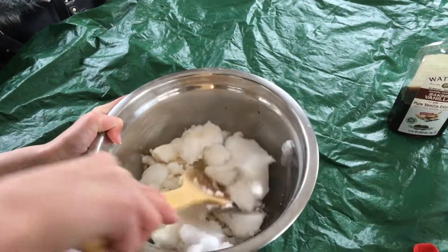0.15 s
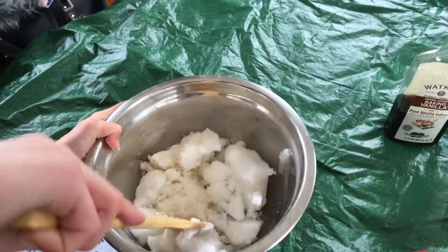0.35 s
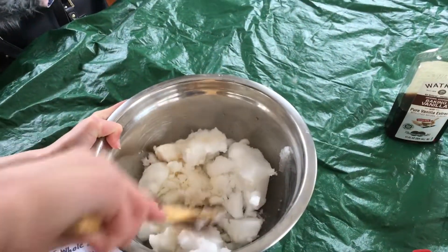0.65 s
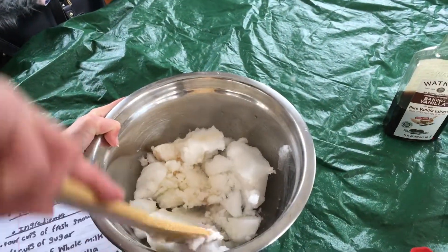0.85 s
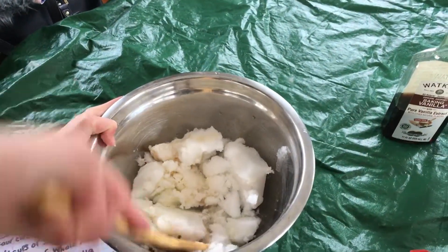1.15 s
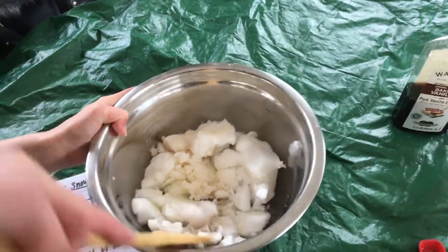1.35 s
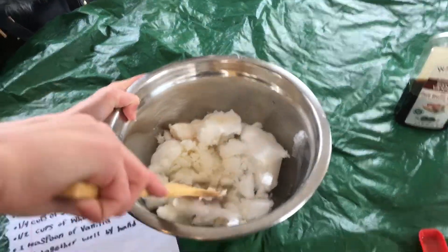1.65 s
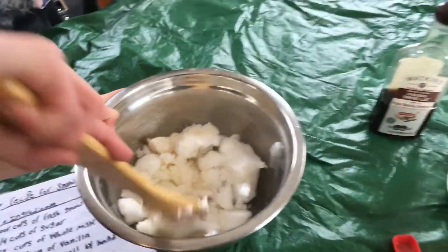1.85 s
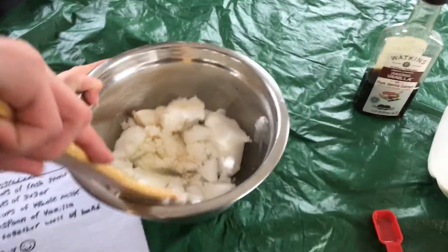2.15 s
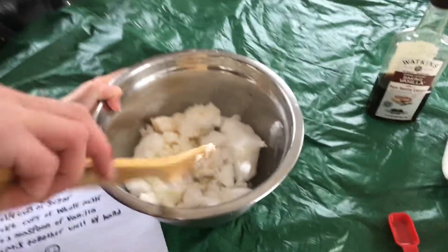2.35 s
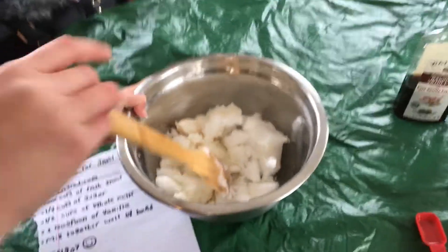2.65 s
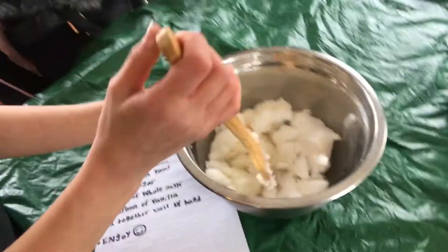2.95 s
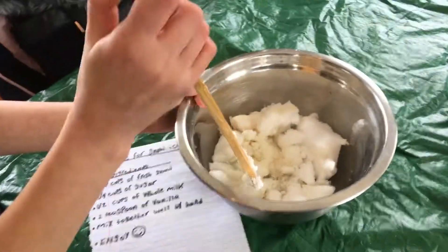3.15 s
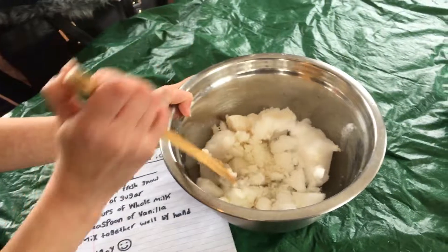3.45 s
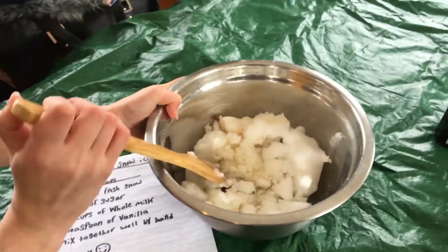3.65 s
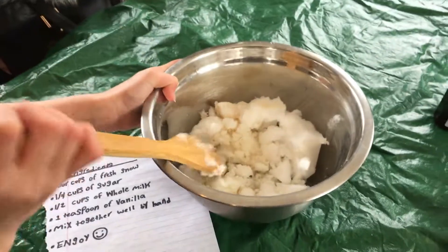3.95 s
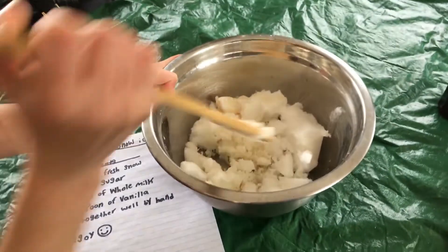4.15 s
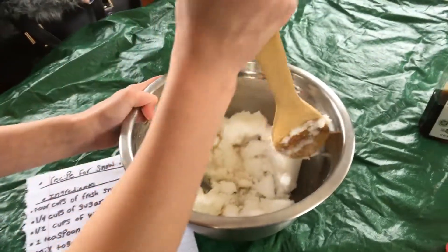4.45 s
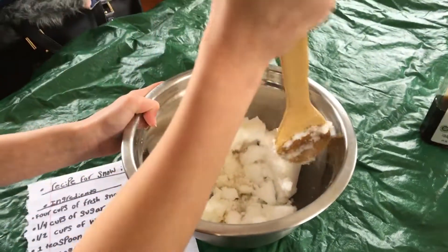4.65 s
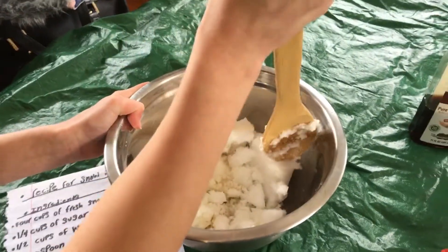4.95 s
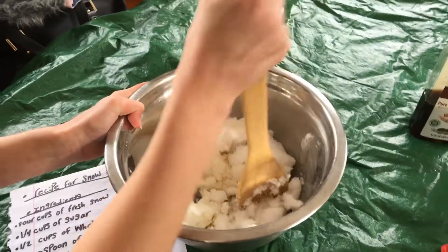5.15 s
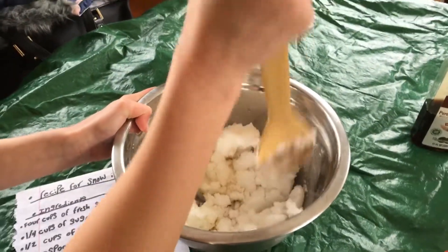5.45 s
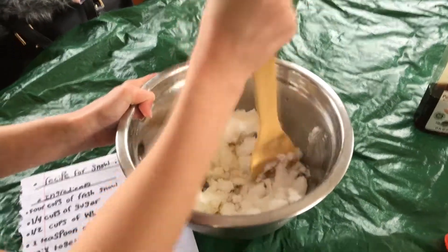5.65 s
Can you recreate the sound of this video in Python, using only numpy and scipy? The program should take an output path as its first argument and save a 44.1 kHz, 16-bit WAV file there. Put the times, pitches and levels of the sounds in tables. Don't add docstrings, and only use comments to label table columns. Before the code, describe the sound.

A wooden spoon works wet, icy snow in a steel bowl, heard close on a small bright microphone indoors. Quick gritty scrapes begin at once, with hard knocks around one and two seconds. Softer mashing, small crunches and faint wet pops follow. After a sparse stretch, a cluster of crisp skids ends in a heavy knock and table thump just past five seconds, then another near the end, over low rumble and hiss.

```python
import sys
import numpy as np
from scipy import signal
from scipy.fft import rfft, irfft
from scipy.io import wavfile
from scipy.ndimage import uniform_filter1d, map_coordinates

SR = 44100
rng = np.random.default_rng(int(sys.argv[2]) if len(sys.argv) > 2 else 0)


def waveform_to_disk(signal):
    frames = np.transpose(np.atleast_2d(signal))
    scaled = np.clip(frames, -1, 1) * 32767
    samples = np.round(scaled).astype(np.int16)
    wavfile.write(sys.argv[1], SR, samples)


def gain_from_db(level_db):
    decades = np.asarray(level_db, float) / 20
    return 10 ** decades


N = 255780

EDGE_HZ, TOP_HZ = 15850, 16600


def unit(x):
    return x / np.sqrt(np.mean(x ** 2) + 1e-20)


def along(points, hz):
    f, v = np.transpose(points)
    return np.interp(np.log(hz + 1), np.log(f + 1), v)


def wobble(rate):
    knots = rng.standard_normal(int(N * rate / SR) + 4)
    return map_coordinates(knots, [np.arange(N) * rate / SR])


def colour(x, spectrum):
    size = 4096
    cep = irfft(np.log(gain_from_db(along(spectrum, np.fft.rfftfreq(size, 1 / SR))) + 1e-6))
    cep[1:size // 2] *= 2
    cep[size // 2 + 1:] = 0
    h = irfft(np.exp(rfft(cep)))
    return signal.oaconvolve(x, h / np.linalg.norm(h))[:len(x)]


def add(track, s, x):
    part = track[max(round(s * SR), 0):][:len(x)]
    part += x[:len(part)]


def ring(modes, t, detune, attack, rough, spot_hz=None):
    draw = rng.standard_normal((len(modes), 3))
    hz, db, t60 = np.transpose(modes)[:, :, None]
    if spot_hz:
        near = np.exp(-(np.log(hz / spot_hz) / 0.09) ** 2)
        db = db + 5 * near
        t60 = t60 * (1 + 0.7 * near)
    hold = 32
    steps = rng.standard_normal((len(modes), len(t) // hold + 1))
    drift = np.repeat(np.cumsum(steps, axis=1), hold, axis=1)[:, :len(t)]
    drift = uniform_filter1d(drift, size=hold, axis=1)
    phase = 2 * np.pi * hz * (1 + detune * draw[:, 1:2]) * t + draw[:, 2:] + rough * drift
    scatter_db = 1.8
    level = gain_from_db(db + scatter_db * draw[:, :1] - 60 * t / t60)
    return (level * np.sin(phase)).sum(axis=0) * (1 - np.exp(-t / attack))


# start_s, length_s, start_pressure_db, end_pressure_db, bite_into_steel_db
STIRS = [(0.0, 0.25, -41, -51.5, -18.5), (0.225, 0.089, -63, -65.5, -9), (0.406, 0.13, -52.5, -48.5, -12),
         (0.515, 0.12, -53, -54, -12.5), (0.692, 0.21, -56, -56, -15.5), (0.975, 0.018, -51.5, -44.5, -22),
         (1.0, 0.076, -45, -39, -13.5), (1.097, 0.12, -58, -54, -6), (1.26, 0.032, -61, -64, 1),
         (1.31, 0.086, -57, -55.5, -7.5), (1.451, 0.08, -65.5, -59.5, -2.5),
         (1.555, 0.14, -53.5, -50.5, -11.5), (1.76, 0.068, -61.5, -64, -5.5),
         (1.825, 0.067, -56.5, -48.5, -17.5), (1.958, 0.082, -40.5, -55, -7.5),
         (2.05, 0.13, -65.5, -59.5, -7.5), (2.199, 0.13, -61, -52.5, -5.5), (2.346, .13, -49.5, -55, -7.5),
         (2.475, 0.41, -63, -69.5, -3)]
# start_s, length_s, start_pressure_db, end_pressure_db,
# bite_into_steel_db
LATER_STROKES = [(2.93, 0.071, -70.5, -52.5, -11), (3.043, 0.036, -69, -49, -18.5), (3.16, 0.05, -60, -50.5, -11),
                 (3.26, 0.091, -64, -48.5, -14.5), (3.35, 0.059, -53, -52, -11),
                 (3.418, 0.04, -50.5, -41.5, -10.5), (3.47, 0.067, -49.5, -61.5, 1),
                 (3.562, 0.07, -52, -47.5, -22.5), (3.7, 0.064, -71, -64.5, -9), (3.81, 0.035, -66, -59, -9),
                 (3.865, 0.12, -51.5, -58, -7), (4.449, 0.32, -55, -77, -12.5), (5.163, 0.12, -50.5, -74, -10),
                 (5.332, 0.06, -68.5, -44, -17), (5.692, 0.072, -48.5, -65, -7)]
# start_s, pressure_db, length_s, bite_db, crunch_db
SKIDS = [(.003, -38.5, 0.012, -17, -22), (0.028, -35, 0.014, -22, -22), (0.037, -32, 0.0077, -14.5, -11),
         (0.047, -40, .007, -25, -25), (0.077, -45.5, 0.0077, -8, -16), (0.109, -46, 0.016, -15, -14),
         (0.378, -53.5, 0.02, -14, -10), (0.407, -50, 0.023, -23, -12), (0.514, -42.5, 0.015, -25, -14),
         (0.697, -53, 0.006, -2, -17), (0.706, -48, 0.013, -4, -16), (0.822, -52, 0.014, -11, -4),
         (0.899, -44, 0.0106, -25, -5), (0.967, -53, 0.029, -26, 2), (1.367, -61, 0.049, -14, 2.5),
         (1.408, -61, .012, -14, 3), (2.121, -34.5, 0.011, -25, -8.5), (2.514, -54.5, 0.037, -16, -6),
         (3.126, -58.5, .025, -20, -1), (3.18, -58, .025, -20, 0), (3.985, -60, 0.014, -20, 0),
         (4.409, -37, 0.011, -17, -7.5), (4.418, -51, 0.017, -13, -8), (4.702, -46.5, 0.02, -7, -5),
         (4.906, -39, 0.013, -11, -1), (4.914, -48.5, 0.013, -20, -1), (4.927, -37.5, .012, -33, -22.5),
         (4.939, -47.5, .012, -32, -18.5), (5.013, -58, 0.13, -16, -12.5), (5.04, -47, .008, -13, -16),
         (5.073, -42, 0.026, -13, -6), (5.094, -32.5, 0.0076, -26, -6), (5.1, -29.5, 0.011, -28.5, -5.5),
         (5.112, -31, 0.017, -21.5, -8), (5.129, -24.5, 0.0097, -22, -12),
         (5.135, -32.5, 0.013, -17.5, -11.5), (5.173, -48, .006, -26, -7), (5.19, -44, .005, -26, -12),
         (5.252, -54, .014, -25, -7), (5.306, -55.5, .012, -27, -15.5), (5.6168, -30, 0.029, -26, -10.5),
         (5.644, -32.5, .0296, -21, -14.5), (5.673, -34, 0.014, -31, -13)]
STIR_CRUNCH_DB, LATER_CRUNCH_DB = -6, -6.5
STROKE_SHEEN_DB, SKID_SHEEN_DB = -5, -9.5
GRIP_DB_PER_S, LIFT_DB_PER_S = 700.5, 404.5
SKID_RISE_S = 0.0054


def spoon():
    levels = np.zeros((4, N))
    t = np.arange(SR // 5) / SR
    for strokes, crunch_db in ((STIRS, STIR_CRUNCH_DB), (LATER_STROKES, LATER_CRUNCH_DB)):
        for s, length, start_db, end_db, bite_db in strokes:
            lead = min(s, len(t) / SR / 4)
            u = np.arange(round((lead + length) * SR) + len(t)) / SR - lead
            edge_db = GRIP_DB_PER_S * np.minimum(u, 0) - LIFT_DB_PER_S * np.maximum(u - length, 0)
            shape = gain_from_db(np.interp(u, [0, length], [start_db, end_db]) + edge_db)
            gains = layers(0, bite_db, crunch_db, STROKE_SHEEN_DB)
            for level, gain in zip(levels, gains):
                add(level, s - lead, (gain * shape) ** 2)
    unsteady_db = 0.29 * wobble(80) + 1.96 * np.array([wobble(20) for _ in levels])
    levels = np.sqrt(levels) * gain_from_db(unsteady_db)
    for s, db, length, bite_db, crunch_db in SKIDS:
        shape = (1 - np.exp(-t / SKID_RISE_S)) / (1 + (t / length) ** 6) * gain_from_db(-5 * t / length)
        gains = layers(db, bite_db, crunch_db - CRUNCH_PER_BITE * bite_db, SKID_SHEEN_DB)
        for level, gain in zip(levels, gains):
            add(level, s + 0.001, gain * shape)
    return ice(*levels, clump_db=1.55, sing_db=-17, even=0)


CRUNCH_PER_BITE = 0.4


def layers(db, bite_db, crunch_db, sheen_db):
    return gain_from_db(db + np.array([0, crunch_db + CRUNCH_PER_BITE * bite_db, bite_db, sheen_db]))


# pitch_hz, level_db_per_hz
FIZZ = [(2000, -46), (4000, -26), (6800, -28.5), (7090, -44), (7530, -34.5), (8040, -2), (8750, 3),
        (9290, 3), (10200, -9.5), (11300, -11), (14400, -11.5), (15200, -12), (15700, -32.5)]
# pitch_hz, level_db_per_hz
CRUNCH = [(2470, -37), (4200, -10.5), (4940, -3), (5370, 2), (6250, 0), (6520, -3), (7600, -6), (9880, -19),
          (16700, -120)]
# pitch_hz, level_db_per_hz
SCRAPE = [(530, -71), (900, -20), (1180, -5.5), (1580, -6), (3040, -5.5), (3480, -2.5), (4140, -8.5),
          (4800, -7), (6240, -18), (10600, -120)]
# pitch_hz, level_db_per_hz
SHEEN = [(8500, -67.5), (10200, -1.5), (11500, -1.5), (13500, -1.5), (15200, -8), (15700, -20)]


def ice(fizz, crunch, scrape, sheen, clump_db, sing_db, even):
    def grain():
        return grit(2.56, clump_db, even)

    rub = colour(scrape * grain(), SCRAPE)
    steel = ring(BOWL + BELLY, np.arange(SR // 5) / SR, 0.0018, 0.00015, 0.2)
    sing = signal.fftconvolve(rub, steel / np.linalg.norm(steel))[:N]
    crystals = colour(fizz * grain(), FIZZ) + colour(sheen * grain(), SHEEN) + colour(crunch * grain(), CRUNCH)
    return crystals + rub + gain_from_db(sing_db) * sing


PATCH_DB, BIGGEST = 1.8, 7


def grit(spread_db, clump_db, even):
    crystal = np.minimum(rng.exponential(size=N), BIGGEST)
    size = gain_from_db(spread_db * crystal + clump_db * (wobble(300) + wobble(60)))
    z = signal.stft(size * rng.standard_normal(N), nperseg=256)[2]
    field = uniform_filter1d(rng.standard_normal(z.shape), size=6, axis=0)
    field = uniform_filter1d(field, size=8, axis=1)
    x = signal.istft(z * gain_from_db(PATCH_DB * unit(field)), nperseg=256)[1][:N]
    power = np.abs(uniform_filter1d(x ** 2, size=64) + 1e-9)
    return unit(x / power ** (even / 2))


# start_s, crack_peak_db, bright_ring_db, dull_ring_db, nearest_mode_hz
KNOCKS = [(0.038, -18, -58, -64, 3570), (0.082, -38, -49, -39.5, 3450), (0.524, -22.5, -65, -41.5, 1970),
          (0.9955, -12, -31, -39, 3870), (1.238, -13.5, -27, -32, 4340), (1.939, -3.5, -27.5, -44, 3860),
          (1.967, -21, -46, -51, 1450), (1.976, -19, -39, -54, 6860), (3.4639, -23, -32.5, -50, 6170),
          (3.852, -41, -37, -40, 870), (4.4572, -27.5, -42, -36, 1310), (5.1478, -4, -34, -39, 1115),
          (5.689, -4.5, -45, -50, 5400), (5.6943, -19, -33.5, -37, 2470)]
# start_s, crack_peak_db, crunch_db, body_db, t60_s
TICKS = [(0.369, -50, -70, -76, 0.029), (0.382, -36, -41.5, -57, 0.021), (.6945, -39.5, -51, -49, 0.0083),
         (5.0414, -43, -50, -51, 0.013), (5.6205, -34, -42, -53, 0.014), (0.9954, -29.5, -28, -46, 0.0065),
         (1.0525, -34, -55, -60, .012), (2.1941, -32, -32, -38, 0.012), (2.3008, -42, -67, -40.5, 0.0088),
         (2.661, -60, -66, -50.5, 0.01), (3.148, -63, -62, -56, 0.012), (3.2354, -33.5, -21, -35, 0.013),
         (3.3593, -44, -52, -43.5, 0.018), (3.4639, -15, -14.5, -34, 0.011),
         (3.485, -45.5, -37, -50, 0.054), (3.6616, -56, -59.5, -49.5, 0.016), (1.909, -66, -42, -62, 0.014),
         (1.9389, -5.5, -22, -17, 0.0047), (4.458, -52, -43, -46.5, 0.107), (4.788, -65, -62.5, -58, .01),
         (4.822, -63, -66, -61, 0.0084), (4.853, -61, -64, -60.5, .008), (5.148, -18, -16, -26.5, 0.0098),
         (5.6954, -29.5, -23, -34, 0.013), (5.713, -50, -54, -39, 0.01), (5.725, -48, -52, -40, 0.011)]
# pitch_hz, level_db, t60_s
BOWL = [(2820, -5, 0.25), (3620, -10.5, 0.073), (3570, 1, 0.07), (3860, 4.5, 0.066), (4580, 13, 0.038),
        (5100, -2, 0.113), (5390, -23, .15), (5650, -1, 0.11), (6170, -1.5, 0.16), (6630, 6, 0.066),
        (6860, 5.5, 0.061), (7600, -8.5, .05)]
# pitch_hz, level_db, t60_s
BELLY = [(696, -18.5, 0.1), (850, -2, 0.053), (1104, -2.5, 0.28), (1214, -16, 0.19), (1360, -1.5, 0.14),
         (1450, -6, 0.34), (1724, -8.5, 0.21), (1970, -4.5, 0.13), (2455, 3, 0.1)]
KNOCK_SHEEN_DB = -15
WASH_DB, WASH_S = -27.5, 0.22


def bowl():
    out, cracks = np.zeros(N), np.zeros((4, N))
    t = np.arange(SR // 4) / SR
    crack_t60_s, blur = (0.011, 0.009, 0.009, 0.008), 0.34

    def snap(t60):
        return (1 - np.exp(-t / 0.001)) * gain_from_db(-60 * t / t60)

    for s, db, bright_db, dull_db, spot_hz in KNOCKS:
        sheen_db = (db + bright_db) / 2 + KNOCK_SHEEN_DB
        peaks_db = (db - 2.5, bright_db + 6.5, bright_db + 1.5, sheen_db)
        for crack, peak_db, t60 in zip(cracks, peaks_db, crack_t60_s):
            add(crack, s - 0.001, gain_from_db(peak_db) * (snap(t60) + gain_from_db(-25.0) * snap(0.06)))
        for crack in cracks[1:3]:
            add(crack, s, gain_from_db(bright_db + WASH_DB) * snap(WASH_S))
        add(out, s - 0.001, gain_from_db(bright_db - 19.5) * ring(BOWL, t, 0.0059, 0.00018, blur, spot_hz))
        add(out, s, gain_from_db(dull_db - 19.0) * ring(BELLY, t, 0.005, 0.00088, blur, spot_hz))
    for s, db, crunch_db, body_db, t60 in TICKS:
        peaks_db = (db - 3.0, crunch_db - 7.5, body_db + 3.0, db + 2.0)
        for crack, peak_db in zip(cracks, peaks_db):
            add(crack, s - 0.001, gain_from_db(peak_db) * snap(t60))
    return out, ice(*cracks, clump_db=1, sing_db=-26.5, even=1)


# start_s, pitch_hz, level_db,
# t60_s
FREE = [(.034, 3430, -44.5, 0.057), (.079, 3500, -45.5, 0.045), (.112, 3570, -52.5, .12),
        (.115, 5530, -56, 0.092), (1.245, 1158, -51.5, 0.33), (1.251, 1675, -45.5, 0.14),
        (1.27, 1450, -58.5, 0.5), (1.239, 3930, -55, 0.65), (1.238, 4580, -40, 0.09),
        (1.239, 4980, -48, 0.33), (1.239, 5550, -53, .2), (1.3, 3900, -64, 0.44), (1.345, 1150, -55, 0.3),
        (5.699, 265, -27, 0.096), (1.961, 1466, -51.5, 0.44), (1.98, 1690, -61, .4),
        (1.939, 2729, -47.5, 0.26), (1.94, 3865, -43, 0.43), (1.938, 3370, -28.5, 0.034),
        (3.47, 3487, -46, 0.3), (3.463, 3670, -44.5, 0.28), (3.464, 1720, -43.5, 0.13),
        (3.464, 5350, -44, 0.16), (3.463, 6040, -46, 0.05), (3.852, 860, -50, .08),
        (3.861, 1040, -55.5, 0.42), (3.884, 697, -53.5, 0.18), (3.495, 135, -38, 0.18),
        (3.852, 3430, -57, 0.29), (3.853, 3820, -51.5, 0.39), (3.85, 4630, -48, 0.18),
        (5.1481, 586, -19, 0.057), (5.215, 604, -41.5, 0.12), (5.148, 1190, -24, 0.052),
        (5.149, 1652, -29, 0.06), (.9965, 3800, -41, 0.082), (1.055, 3516, -52, 0.26),
        (4.459, 2455, -42.5, .08), (4.459, 1940, -41, 0.13), (4.458, 3820, -45.5, 0.11),
        (5.619, 3900, -47, .12), (5.62, 4370, -49.5, .1), (5.6915, 591, -21.5, 0.049),
        (5.6955, 2330, -23, 0.022), (5.765, 588, -46, 0.15)]
FREE_RISE_S = 0.00087
FREE_BLUR, FREE_SPLIT = 0.42, 0.008


def lingering():
    out = np.zeros(N)
    t = np.arange(SR // 3) / SR
    for s, hz, db, t60 in FREE:
        twins = [(hz, db - 3.0, t60), (hz, db - 1.0, t60)]
        blur = FREE_BLUR * min(1, hz / 2500 + 0.2)
        add(out, s, ring(twins, t, FREE_SPLIT, FREE_RISE_S, blur))
    return out


# start_s, thump_peak_db, table_top_db, nearest_top_mode_hz
THUDS = [(0.0, -44.5, -61.5, 582), (0.081, -70, -54, 582), (0.395, -39, -65, 374),
         (0.525, -38.5, -53.5, 582), (.996, -48, -52, 668), (1.079, -45.5, -54, 1100),
         (1.236, -32.5, -40, 1200), (1.937, -43, -38.5, 850), (3.462, -29, -43, 360),
         (3.852, -34, -50, 850), (3.906, -43, -55, 850), (3.972, -43, -63, 582), (4.456, -49.5, -44, 360),
         (4.92, -42, -71, 582), (5.04, -46.5, -48.5, 1100), (5.146, -14.5, -21, 1103),
         (5.632, -43.5, -72, 582), (5.651, -44, -80, 582), (5.688, -32, -34.5, 582),
         (5.696, -16, -35.5, 360)]
# pitch_hz, level_db, t60_s
TOP = [(357.5, -4, 0.084), (464, -15, 0.066), (582, 3, 0.048), (668, -10, 0.12), (850, -25, 0.062),
       (1100, -11.5, 0.046), (1200, -1.5, 0.036), (1333, -17, 0.092), (1610, -6.5, 0.04)]
# pitch_hz, level_db, t60_s
FRAME = [(98.5, 2.5, 0.097), (124.7, -2, 0.24), (154.8, -7, 0.21), (197.3, -7, 0.12), (253.4, -16.5, 0.068)]
# pitch_hz, level_db_per_hz
BOOM = [(130, -34), (220, 1.5), (409, -4.5), (580, -5.5), (768, -7), (1090, -7.5), (1530, -14.5),
        (1670, -12.5), (2400, -26.5), (3120, -55), (5280, -120)]


def table():
    out, shake = np.zeros(N), np.zeros(N)
    t = np.arange(SR // 3) / SR
    top_blur, frame_blur = 0.38, 0.03
    for s, db, top_db, spot_hz in THUDS:
        add(out, s + 0.001807, gain_from_db(top_db - 4.0) * ring(TOP, t, 0.0013, 0.00077, top_blur, spot_hz))
        add(out, s + 0.00051, gain_from_db(db - 2) * ring(FRAME, t, 0.015, 0.0091, frame_blur))
        add(shake, s + 0.0049, gain_from_db(top_db - 7.5 - 60 * t / 0.27) * (1 - np.exp(-t / 0.0033)))
    return out + colour(shake * rng.standard_normal(N), BOOM)


# start_s, peak_db,
# pitch_hz, life_cycles
POPS = [(1.128, -52, 1100, 5.4), (1.462, -57.5, 1710, 7.2), (1.464, -59, 326, 5.9),
        (1.704, -49.5, 338, 4.3), (1.746, -41.5, 410, 1.1), (1.829, -52.5, 323, 4.7),
        (2.194, -34, 702, 4.9), (2.2, -52, 388, 5.1), (2.274, -37, 485, 1.5), (2.278, -44.5, 310, 2.7),
        (2.4, -57, 295, 2.6), (2.571, -53, 333, 4.3), (2.664, -49, 302, 1.4), (2.749, -51, 282, 1.7),
        (2.884, -46.5, 700, 4.3), (2.908, -51, 340, 1.8), (2.981, -63, 650, 7), (3.147, -60, 355, 1.8),
        (3.149, -55, 1450, 3.5), (3.235, -42, 1060, 4), (3.24, -46.5, 614, 3.5), (3.3, -53.5, 362, 3.3),
        (3.311, -52, 420, 2.2), (3.327, -57, 400, 2), (3.383, -49, 300, 1.4), (3.359, -47.5, 1000, 6.8),
        (3.588, -57, 750, 4.4), (3.66, -61, 280, 4.2), (3.661, -50.5, 1100, 2.3), (3.67, -59, 545, 5.8)]
SAG = 0.2


def pockets():
    out = np.zeros(N)
    for s, db, hz, cycles in POPS:
        u = np.arange(round(2 * cycles / hz * SR)) / SR * hz / cycles
        hump = u ** 0.56 * np.exp(-(1.215 * u) ** 2)
        tone = np.sin(2 * np.pi * cycles * u * (1 + SAG * (1 - u)))
        add(out, s + 0.0003, gain_from_db(db + 8.5) * hump * tone)
    return out


# pitch_hz, t60_s
ROOM = [(120, 0.24), (600, 0.44), (2000, 0.45), (8500, 0.22), (11000, 0.11)]


def room(x):
    hz, t, z = signal.stft(rng.standard_normal(SR // 2), SR, nperseg=256)
    tail = signal.istft(z * gain_from_db(-60 * t / along(ROOM, hz)[:, None]), SR, nperseg=256)[1]
    late = np.pad(x, (250, 0))
    return signal.fftconvolve(late, tail / np.linalg.norm(tail))[:N]


# pitch_hz, level_db_per_hz
RUMBLE = [(15, -60.5), (25, -54.5), (48, 5), (86, 2), (113, 3), (200, -6), (260, -24), (440, -120)]
# pitch_hz, level_db_per_hz
MURMUR = [(110, -23.5), (180, -4), (308, -1), (562, -14.5), (692, -10), (900, -17), (1170, -35.5),
          (1980, -120)]
# time_s, level_db
SLUSH = [(0.0, -69), (0.34, -70.5), (1.97, -63.5), (2.96, -67), (3.36, -64), (4.23, -71), (5.3, -68.5),
         (5.65, -73), (5.8, -53)]
# pitch_hz, level_db_per_hz
HISS = [(240, -26.5), (400, -2), (481, -23.5), (527, -1), (717, -10), (875, -12), (960, -9.5), (1040, -4.5),
        (1120, -4.5), (1640, -8), (2130, -8.5), (4130, -8.5), (4740, -12.5), (15700, -15.5)]
HISS_DB = -63.5
RUMBLE_DB, SWAY_DB, SWAY_S = -60.5, -17.5, 0.35


def floor():
    sway = np.full(N, gain_from_db(RUMBLE_DB))
    t = np.arange(SR // 2) / SR
    for s, db, *_ in THUDS:
        add(sway, s, gain_from_db(db + SWAY_DB - 60 * t / SWAY_S) * (1 - np.exp(-t / 0.0096)))
    slush_s, slush_db = np.transpose(SLUSH)
    murmur_db = np.interp(np.arange(N) / SR, slush_s, slush_db)
    lumps = gain_from_db(1.9 * wobble(8.6) + 0.73 * wobble(3.23))
    rumble = unit(colour(lumps * rng.standard_normal(N), RUMBLE))
    murmur = unit(colour(gain_from_db(3.6 * wobble(30)) * rng.standard_normal(N), MURMUR))
    hiss = colour(rng.standard_normal(N), HISS)
    return sway * rumble + gain_from_db(murmur_db + 1.5) * murmur + gain_from_db(HISS_DB - 5.0) * hiss


def scene():
    scrapes = spoon()
    rings, cracks = bowl()
    pops = pockets()
    blows = rings + table() + lingering()
    tail = room(gain_from_db(-15.0) * (scrapes + cracks) + gain_from_db(-13.0) * blows + gain_from_db(-25.5) * pops)
    steady = scrapes + tail + floor()
    steady = irfft(rfft(steady) * (np.fft.rfftfreq(N, 1 / SR) < EDGE_HZ), N)
    return (steady + blows + cracks + pops)[None]


def low_pass(x):
    return signal.sosfilt(signal.butter(12, 16620, fs=SR, output="sos"), x)


def record(dry):
    hz = np.fft.rfftfreq(N, 1 / SR)
    bass_cut = (1j * hz / (45 + 1j * hz)) ** 2
    response = bass_cut * np.where(hz < EDGE_HZ, 1, gain_from_db(-15.0)) * (hz < TOP_HZ)
    return low_pass(irfft(rfft(dry) * response, N))


dry = scene()
out = record(dry)
waveform_to_disk(out)
```